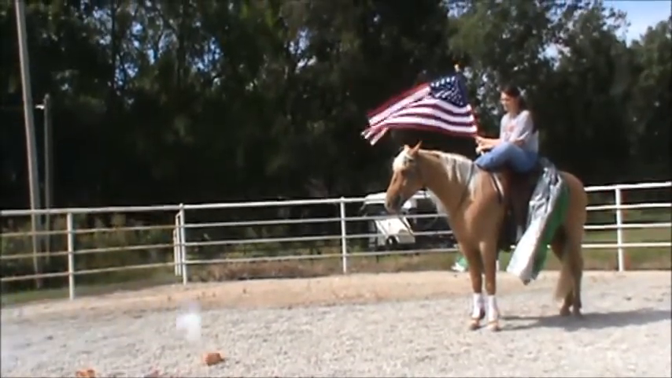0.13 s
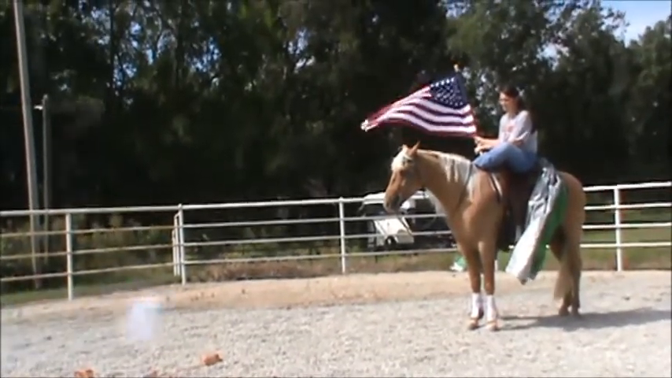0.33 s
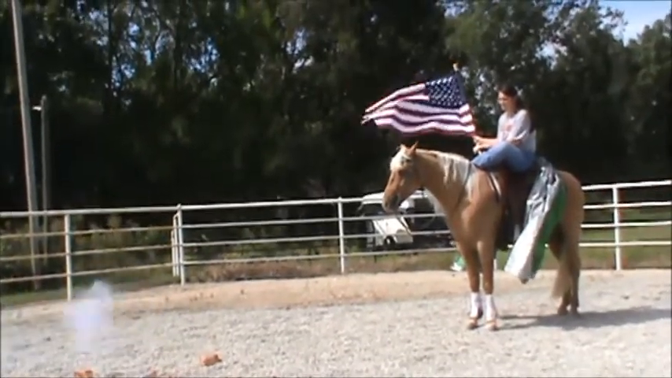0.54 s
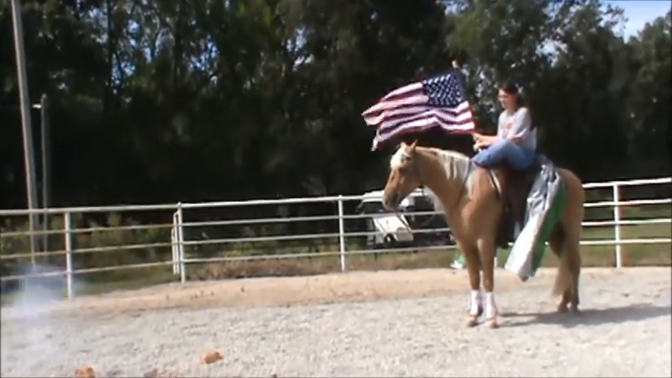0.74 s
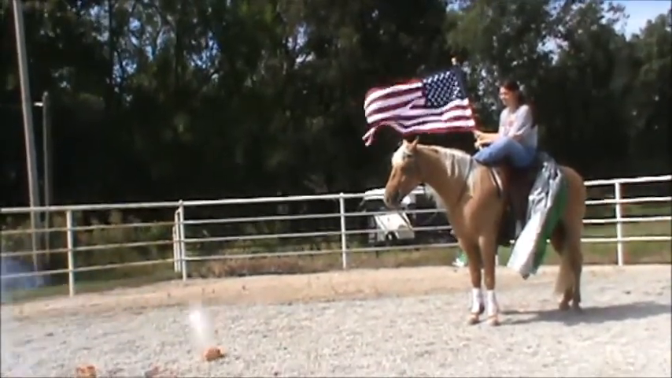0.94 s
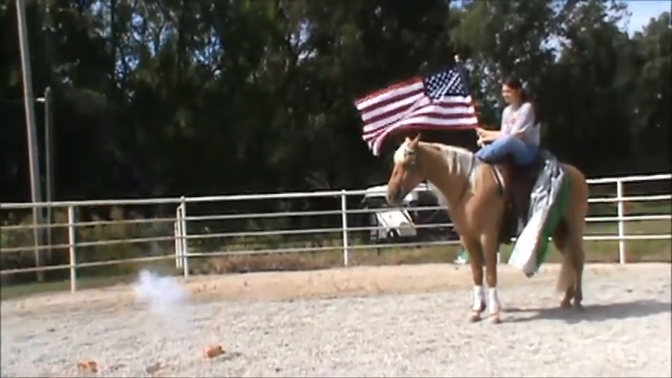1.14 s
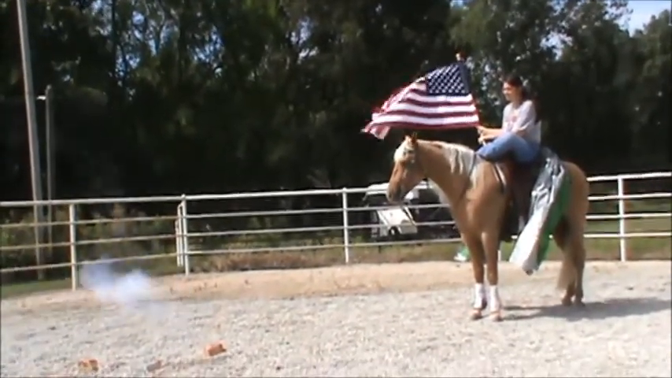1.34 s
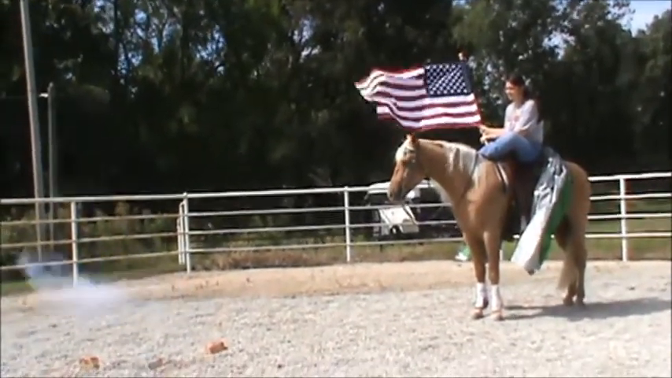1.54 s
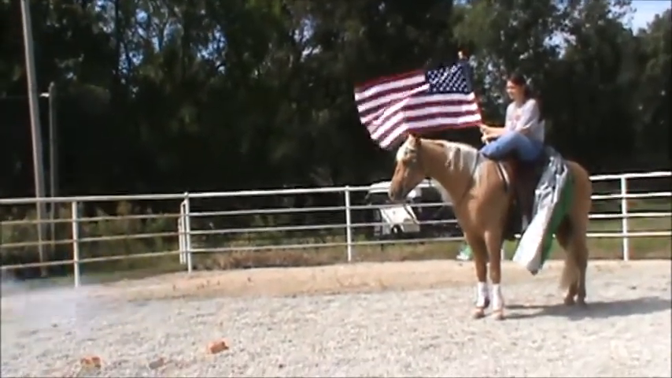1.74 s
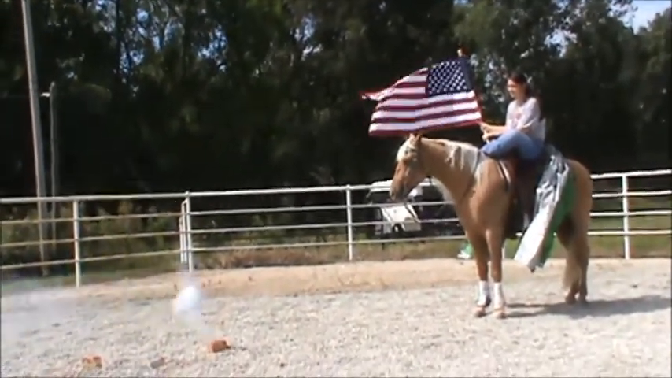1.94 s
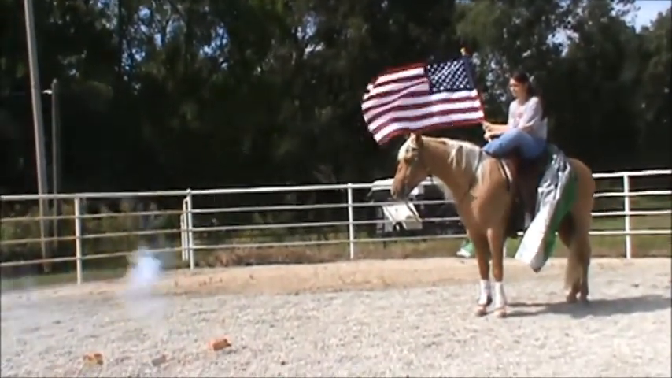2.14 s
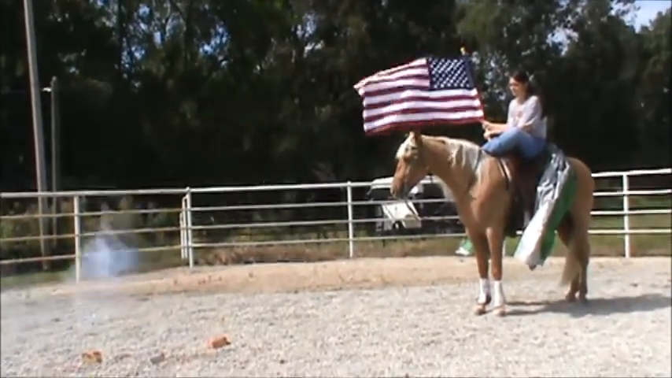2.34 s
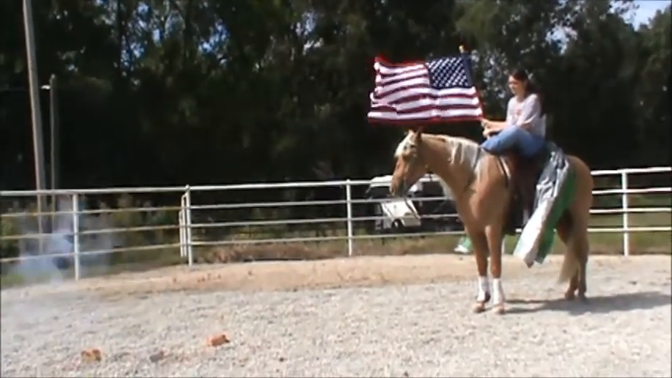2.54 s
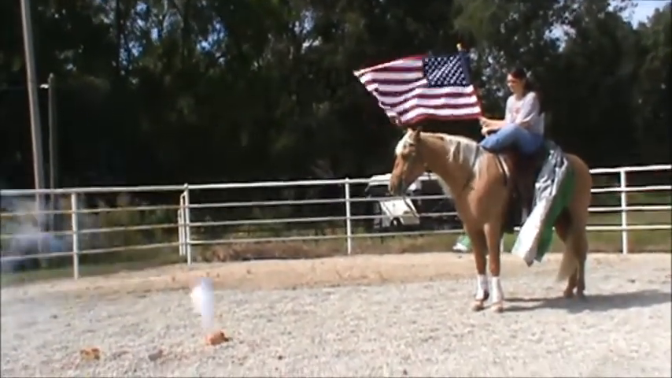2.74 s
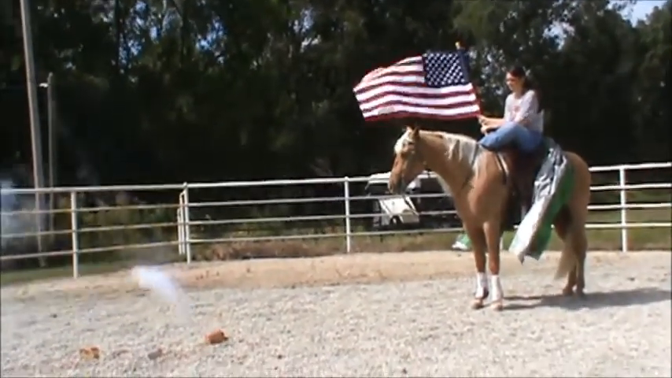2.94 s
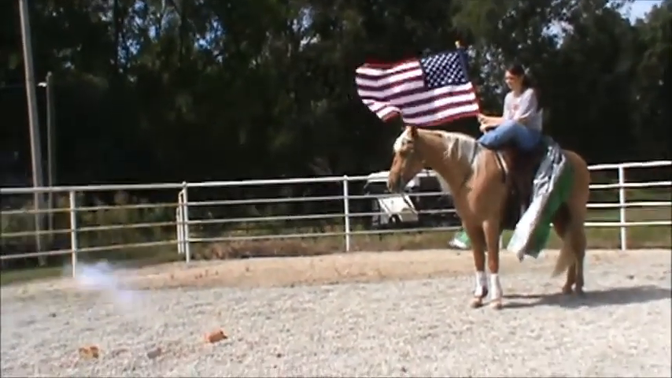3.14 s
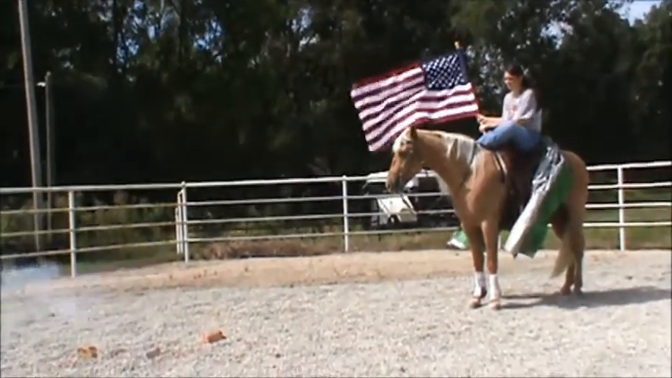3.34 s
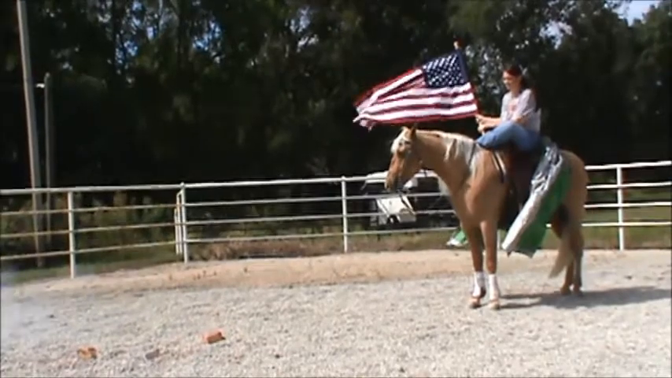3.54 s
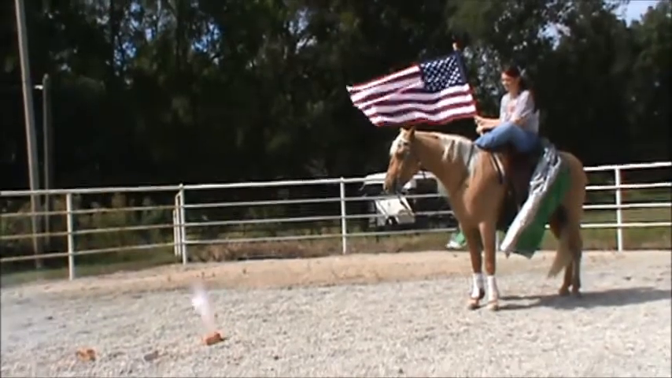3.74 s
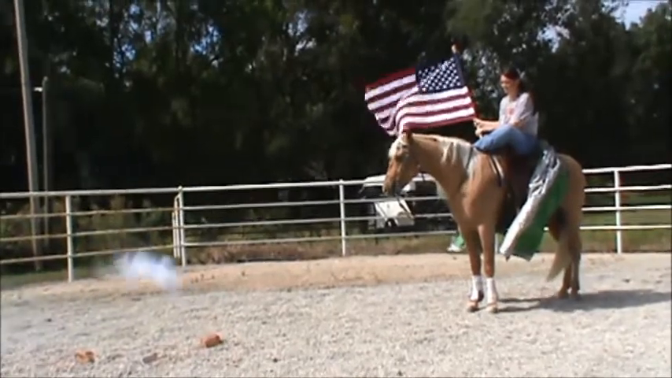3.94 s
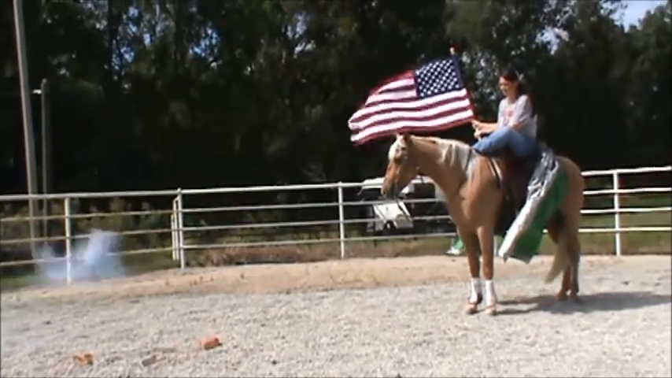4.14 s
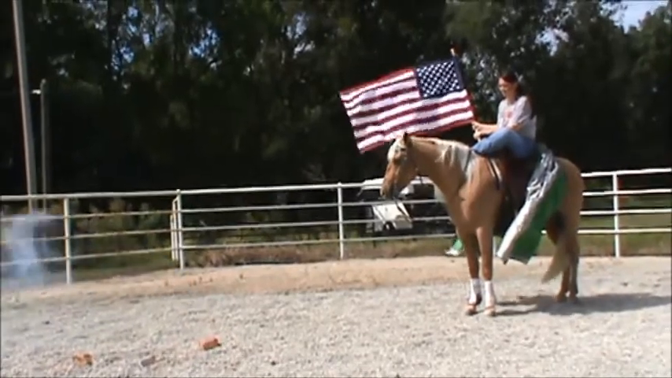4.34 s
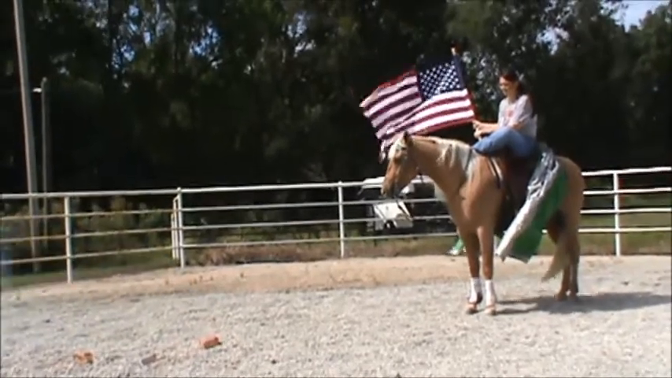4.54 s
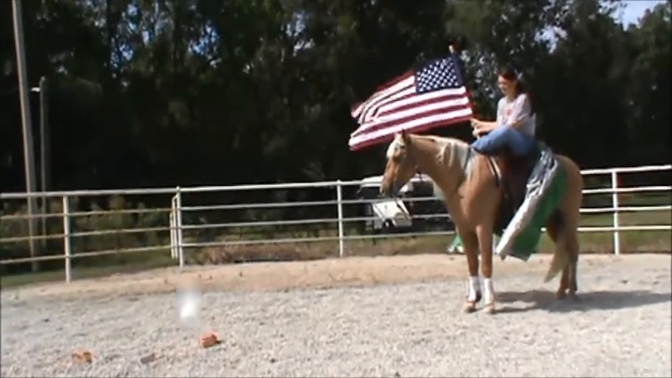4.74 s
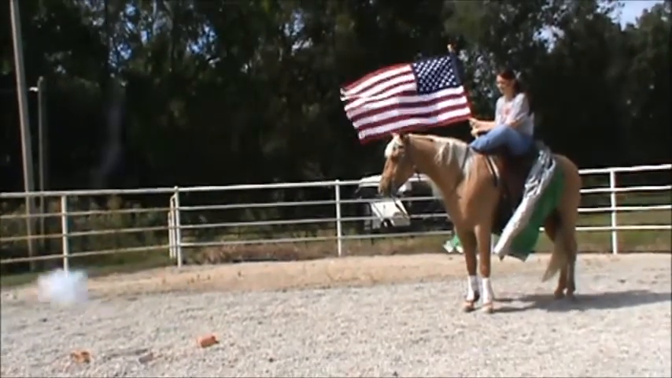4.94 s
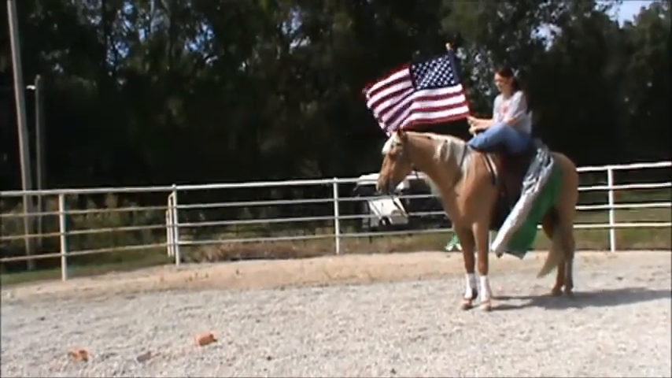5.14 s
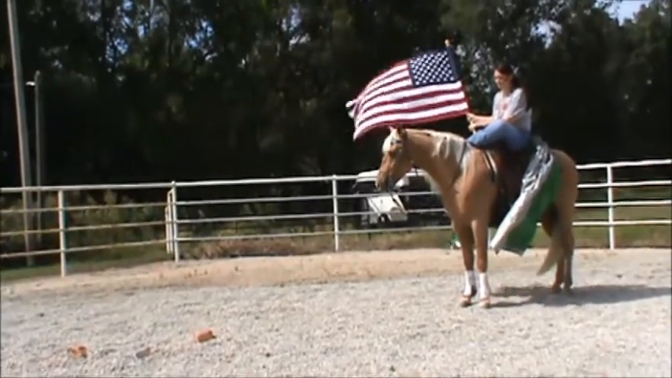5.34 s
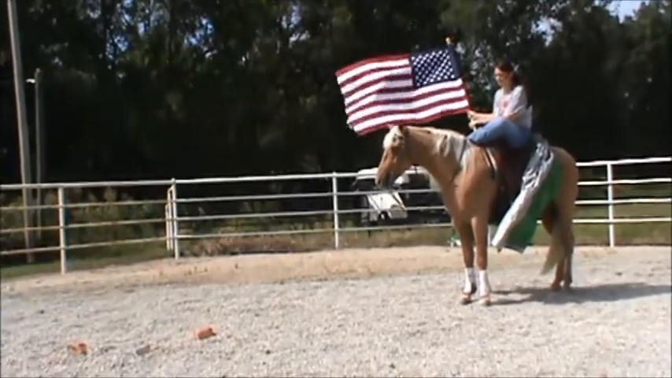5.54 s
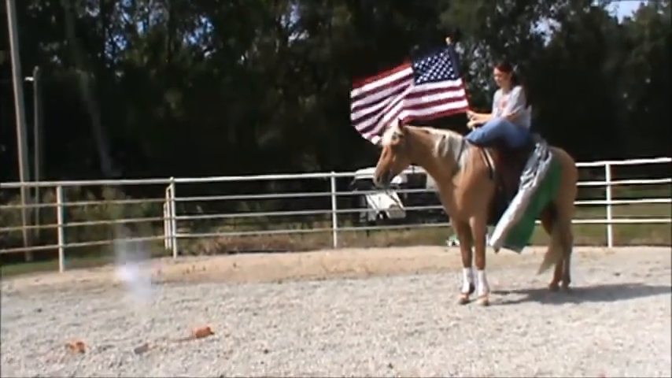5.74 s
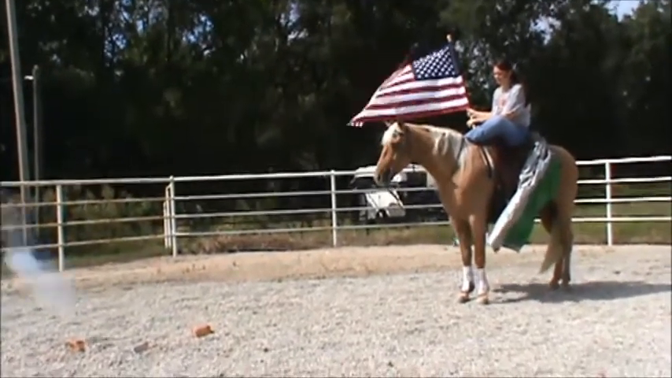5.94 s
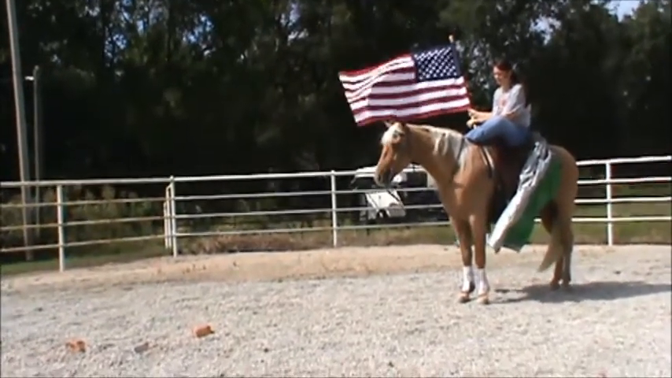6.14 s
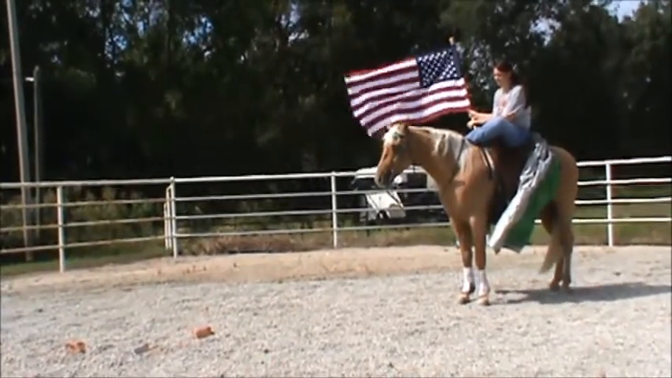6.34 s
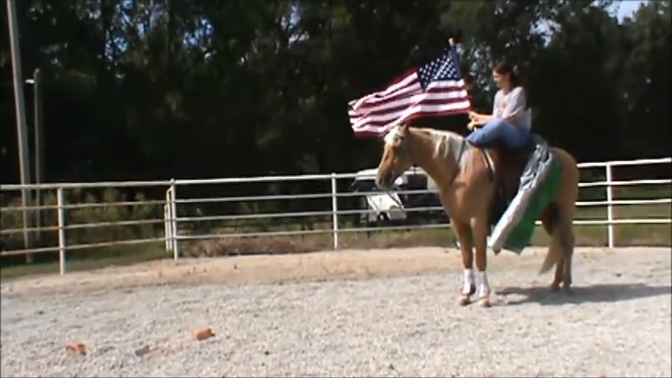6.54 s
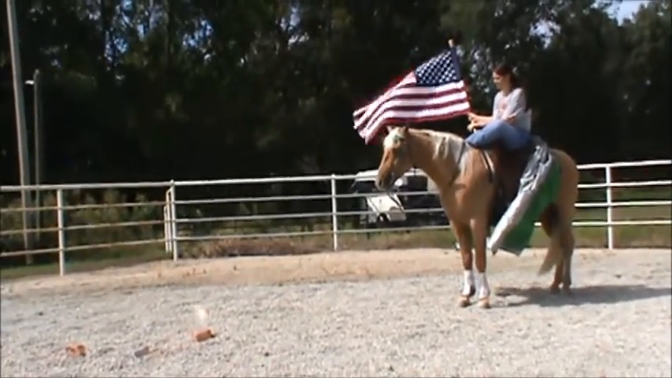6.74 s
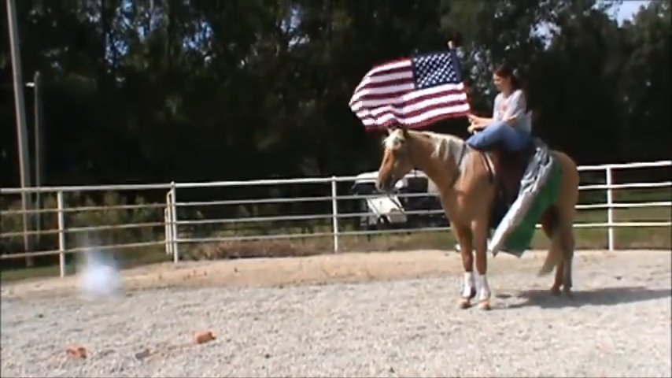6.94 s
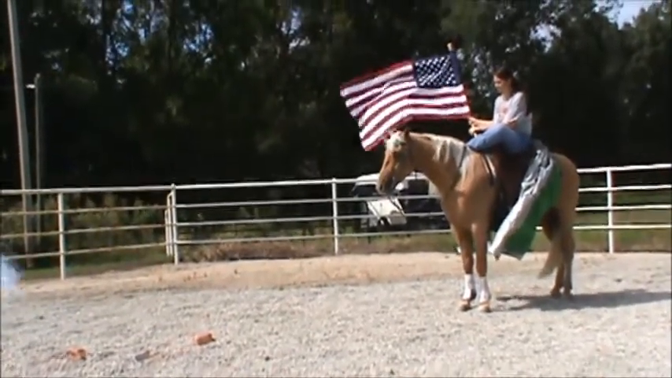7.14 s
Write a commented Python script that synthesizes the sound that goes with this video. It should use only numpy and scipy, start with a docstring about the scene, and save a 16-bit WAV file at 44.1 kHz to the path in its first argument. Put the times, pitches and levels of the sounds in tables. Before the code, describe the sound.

A string of small fireworks pop, whistle briefly and crack in the air outdoors, with wind on the microphone and faint hissing leaves.

```python
"""Small whistling rockets leave the ground one after another in an open sand arena.
Each starts with a pop. Its burning tube pulses, making a falling whistle that throbs as it mixes with
its echo off the sand. Then comes a sharp bang in the air, which the tree line throws back.
Leaves hiss and wind buffets the microphones, whose limiter turns everything down around each bang."""
import sys
import numpy as np
from scipy import signal
from scipy.fft import rfft, irfft
from scipy.io import wavfile
from scipy.ndimage import uniform_filter1d, minimum_filter1d

SR = 44100
rng = np.random.default_rng(int(sys.argv[2]) if len(sys.argv) > 2 else 0)


def master_out(mix):
    """Clip the mix to full scale and print it as 16-bit PCM to the path in sys.argv[1]."""
    frames = np.transpose(np.atleast_2d(mix))
    ceiling = np.clip(frames, -1, 1)
    pcm = np.round(ceiling * 32767).astype(np.int16)
    wavfile.write(sys.argv[1], SR, pcm)


N = 321930

# Hiss of leaves and air: (frequency [Hz], level [dB])
LEAF_COLOUR = [(290, -25), (500, -12), (604, -42), (668, -1.5), (1840, 3), (2650, -4.5), (2890, -4),
               (3650, -7.5), (6140, -11.5), (10800, -0.5), (16000, -17)]
# Wind strength: (time [s], level [dB])
WIND_LEVELS = [(0.0, -26), (0.18, -24), (0.26, -31), (0.75, -45), (0.81, -33), (0.95, -33.5), (1.299, -39),
               (1.44, -23), (1.59, -39), (1.67, -24), (1.85, -24), (2.2, -31.5), (2.6, -22.5), (2.95, -36),
               (3.599, -38), (3.68, -28.5), (3.76, -42), (4.29, -37), (5.41, -40), (5.69, -22),
               (5.81, -32.5), (6.63, -33.5), (6.73, -24.5), (6.93, -29.5), (7.3, -31.5)]
# Wind rumble: (frequency [Hz], level [dB])
WIND_COLOUR = [(12, -41), (20, -26), (66, -3), (139, 0.5), (285, -8), (484, -21.5), (648, -29.5),
               (960, -32), (1200, -49), (1560, -70), (2640, -120)]
# How alike the rumble is left and right: (frequency [Hz], likeness [0-1])
WIND_LIKENESS = [(30, 0.76), (60, 0.88), (125, 0.58), (240, 0.12), (950, 0.056), (3770, 0.73)]
# How long the arena rings: (frequency [Hz], time to fade by 60 dB [s])
ARENA_DECAY = [(300, 0.49), (700, 1.12), (1500, 1.13), (3000, 0.98), (6000, 0.84), (12000, 0.63)]
# Tone of the arena's echo: (frequency [Hz], level [dB])
ECHO_COLOUR = [(200, 8), (600, -3), (1500, -5), (2900, 1), (3700, -5), (4800, 1), (6500, -0.5), (12000, 3)]
# Echo strength as the trees answer: (delay [s], level [dB])
TREE_ECHOES = [(.0, 3), (.045, -5), (.075, -11.5), (.095, -5), (.14, -5), (.25, -5.5)]
# Distant pops: (time [s], level [dB], left over right [dB])
DISTANT_POPS = [(0.783, -19.5, -4)]
# Bangs in the air: (time [s], level [dB], sand echo delay [ms], fence echoes [dB], left over right [dB])
BANGS = [(0.2183, 21, 5.85, -2, -4), (1.33565, 15, 5.75, -10, 1), (2.1828, 14.5, 5.4, -7, 0),
         (3.1501, 13, 4.5, -11, 1.5), (4.00925, 13.5, 5.45, -12, -0.5), (5.021, 12.5, 5.7, -10, 0.5),
         (5.92163, 13.5, 5.9, -8, -3), (6.8663, 19, 6.0, -4, 1)]
# Echoes off the fence rails: (delay [ms])
FENCE_DELAYS = [1.25, 2.75]
# Launch pops: (time [s], crack level [dB], low push level [dB])
LAUNCH_POPS = [(0.183, -1, -9), (1.0038, 9, -1), (1.9604, 4.5, -12), (2.7873, -7, -14.5), (3.8141, 2, -13),
               (4.805, -0.5, -14.5), (5.695, -2, -10), (6.8302, 1, -13.5)]
# Spit of gas at launch: (frequency [Hz], level [dB])
SPIT_COLOUR = [(300, -40), (900, -12), (1700, -7), (3400, -2), (6000, -4), (10900, 0), (14000, -8),
               (16000, -12)]
# Hiss of the jet: (frequency [Hz], level [dB])
JET_COLOUR = [(400, -25), (1500, -20), (2300, -11), (3600, -9.5), (5800, -9.5), (7000, -6), (9000, 2),
              (11800, -3.5), (16000, -22.5)]
# One whistle a row: (start [s], burn [s], settling [ms], tone [dB], fade start [s], fade by the end [dB],
# first pitch [Hz], low pitch [Hz], fall length [s], last pitch [Hz], rise start [s], rise length [s],
# 2nd harmonic [dB], 3rd harmonic [dB], hiss [dB], first throb rate [Hz], first echo delay [ms],
# left over right once aloft [dB]). Fade and rise starts count from the whistle's start.
WHISTLES = [(0.196, .4, 1.15, -5.5, 0.29, -14, 3096, 2482, 0.33, 2720, 0.3, .13, -15, -14, -16, 46, 1.007, 4.5),
            (1.017, .43, 1.26, -8, 0.24, -15, 3083, 2463, 0.36, 2610, .39, 0.045, -15.5, -16.5, -17, 40.2, 1.076, 4),
            (1.972, 0.38, 2.33, -15.5, .32, -19.5, 3135, 2388, .33, 2710, .31, .07, -24.5, -24, -26.5, 45, 1.03, 7.5),
            (2.8, 0.45, 2.55, -16, 0.317, -9, 3168, 2437, 0.34, 2850, .39, 0.058, -25, -25, -25.5, 40, 1.025, 7),
            (3.827, .43, 1.42, -13, 0.33, -18, 3070, 2370, .33, 2690, .375, 0.074, -23, -19.5, -23, 45.75, 1.034, 7),
            (4.822, .38, 2.2, -11.5, 0.23, -12.5, 3135, 2609, 0.31, 2780, .32, .06, -24, -20, -23, 43.4, 1.015, 4.5),
            (5.719, .385, 12, -12, 0.26, -15.5, 3223, 2600, .29, 2936, 0.33, 0.032, -23.5, -21.5, -23.5, 43.75, 0.984, 9)]
# High harmonics: (multiple of the pitch, level beside the 3rd [dB])
HIGH_HARMONICS = [(4, -5), (5, -18.5)]
# Tone changes during each burn: (part burnt [0-1], 2nd harmonic [dB], 3rd harmonic [dB], hiss [dB])
BURN_STAGES = [(0, -6.5, -0.6, 2), (.15, -3, 0.6, -4), (.55, 0.5, -2.5, 0), (.8, -1.5, -7, -2),
               (.92, -1, -3, -3.5), (1, -19, -4, -2)]
# How much of the tone's fade each part follows: (2nd harmonic [share], 3rd harmonic [share], hiss [share])
FADE_SHARES = [0.94, 0.9, 1]
# How harmonics 1 to 5 follow the rocket's left-right lean: (share [minus = opposite side])
PAN_SHARES = [0.98, 0.51, 0.33, -0.47, -0.99]
# Brief dips in the whistle: (time [s], depth [dB], half width [s])
DROPOUTS = [(0.386, -10, 0.0087), (0.518, -12, 0.0088), (1.344, -13, 0.017), (3.165, -9, 0.017),
            (4.15, -20.5, 0.032), (5.082, -27, 0.0059), (5.135, -6.5, 0.01), (5.958, -14, 0.013)]


def amp(db):
    return 10 ** (np.asarray(db) / 20)


def unit_level(x):
    return x / np.sqrt(np.mean(x ** 2) + 1e-20)


def look_up(points, hz):
    f, value = np.transpose(points)
    return np.interp(np.log(hz + 1), np.log(f + 1), value)


def add(mix, start_s, sound):
    part = mix[:, round(start_s * SR):][:, :sound.shape[1]]
    part += sound[:, :part.shape[1]]


def panned(x, pan_db):
    return np.array([x * amp(pan_db / 2), x * amp(-pan_db / 2)])


def noise(colour, size, likeness):
    """Stereo noise with a given tone colour and left-right likeness."""
    hz = np.fft.rfftfreq(size, 1 / SR)
    left, other = rfft(rng.standard_normal((2, size)))
    same = np.clip(look_up(likeness, hz), -1, 1)
    right = same * left + np.sqrt(1 - same ** 2) * other
    return unit_level(irfft(np.array([left, right]) * amp(look_up(colour, hz)), size))


def wobble(size, hz):
    """A random wander of typical size 1, mostly slower than hz."""
    return unit_level(signal.lfilter(*signal.butter(2, hz, fs=SR), rng.standard_normal(size)))


def glide(age, from_s, length_s, bend=1):
    """Eases from 0 to 1; a bend under 1 moves early."""
    return np.sin(np.pi / 2 * np.clip((age - from_s) / length_s, 0, 1) ** bend) ** 2


def leaves():
    """Leaves and air hiss steadily, swelling a little."""
    level_db = -47.5 + 1.2 * wobble(N, hz=3)
    return amp(level_db) * noise(LEAF_COLOUR, N, likeness=[(1, 1.0), (2e4, 0.75)])


def wind():
    """Swirling air hits the microphones in low lumps that get brighter in gusts."""
    level_db = np.interp(np.arange(N) / SR, *np.transpose(WIND_LEVELS))
    lump_db = 4.42 * wobble(N, hz=16.6)
    rumble = noise(WIND_COLOUR, N, WIND_LIKENESS)
    bright = signal.lfilter(*signal.butter(2, 280, "high", fs=SR), rumble)
    gust_db = .6 * (level_db + 30) + 1.4 * lump_db - 8.5
    return amp(level_db) * (unit_level(rumble * amp(lump_db)) + bright * amp(gust_db))


def arena_echo(sound):
    """Many small echoes swell when the tree line answers; each frequency dies at its own speed."""
    size = 3 * SR // 2
    echoes = np.zeros((2, size))
    arrivals = np.arange(300, size - 20, 20) + rng.integers(0, 20, (2, (size - 301) // 20))
    strengths = rng.choice([-1., 1.], arrivals.shape) * rng.uniform(0.6, 1.04, arrivals.shape)
    np.put_along_axis(echoes, arrivals, strengths, 1)
    echoes[1] = 0.57 * echoes[0] + 0.61 * echoes[1]
    echoes *= amp(1.9 * wobble(size, hz=82))  # trunks stand in clumps
    hz, t, bands = signal.stft(echoes, SR, nperseg=256)
    shape_db = look_up(ECHO_COLOUR, hz)[:, None] + np.interp(t, *np.transpose(TREE_ECHOES))
    shape_db -= 60 * t / look_up(ARENA_DECAY, hz)[:, None]
    tail = signal.istft(bands * amp(shape_db), SR, nperseg=256)[1]
    return signal.fftconvolve(sound.mean(0)[None], tail / np.linalg.norm(tail[0]), axes=1)[:, :N]


def blast(sharp):
    """A pressure wave: a steep front, then one swing back."""
    t = np.arange(200) / SR
    front = t / .000035 * np.exp(1 - t / .000035)
    swing = np.sin(2 * np.pi * 1150 * t) * np.exp(-t / 0.00041) * np.minimum(t / .0001, 1)
    return swing - sharp * front


def bang(level_db, sand_ms, fence_db, pan_db):
    """A blast in the air, then duller echoes off the fence rails and the sand."""
    sound = np.zeros((1, 600))
    add(sound, 0, blast(sharp=1.05)[None])
    for ms in FENCE_DELAYS:
        add(sound, ms / 1000, amp(fence_db) * blast(sharp=0.04)[None])
    add(sound, sand_ms / 1000, amp(-3.5) * blast(sharp=.3)[None])
    return panned(amp(level_db) * sound[0], pan_db)


def launch(crack_db, push_db):
    """A spit of gas builds to a snap, with one low push out of the knocking tube."""
    t = np.arange(1200) / SR - .004  # the snap is at t = 0
    burst = np.exp(-np.abs(t) / np.where(t < 0, .0006, .0008))
    trail = amp(-17.5) * np.exp(-np.abs(t) / np.where(t < 0, .002, .015))
    spit = (burst + trail) * noise(SPIT_COLOUR, len(t), likeness=[(1, 1.0), (2e4, 0.94)])
    snap = np.sin(2 * np.pi * 7000 * t) * np.exp(-(t / .00006) ** 2)
    push = np.sin(2 * np.pi * 330 * t) * np.exp(-t / 0.0027)
    knock = 0.89 * np.sin(2 * np.pi * 850 * t) * np.exp(-t / 0.0015)
    return amp(crack_db) * (amp(-10) * spit + 0.55 * snap) + amp(push_db) * (push + knock) * (t > 0)


def sand_echo(sound, age, hz, throb_hz, first_ms):
    """As the rocket climbs, its echo off the sand comes later and weaker, and throbs against it."""
    delay_s = first_ms / 1000 + np.cumsum(throb_hz * np.exp(-age / 0.568) / hz) / SR
    return np.interp(age - delay_s, age, sound, left=0) * amp(-8 - 16 * age)


def whistle(start_s, burn_s, settle_ms, tone_db, fade_s, lost_db, first_hz, low_hz, fall_s, last_hz,
            turn_s, rise_s, second_db, third_db, hiss_db, throb_hz, echo_ms, pan_db):
    """The burning tube pulses, making a tone with harmonics (multiples of its pitch) over a jet's hiss."""
    age = np.arange(0, burn_s, 1 / SR)
    size = len(age)
    # The pitch sinks as the rocket speeds away and flicks up as it dies.
    fall, rise = glide(age, 0, fall_s, bend=0.95), glide(age, turn_s, rise_s)
    hz = first_hz + (low_hz - first_hz) * fall + (last_hz - low_hz) * rise
    settle = 1 + 0.149 * np.exp(-age / (settle_ms / 1000))  # starts high until the burn steadies
    unsteady = 0.006 * wobble(size, hz=254) + 0.008 * wobble(size, hz=22)
    phase = 2 * np.pi * np.cumsum(hz * (settle + unsteady)) / SR

    fade_db = lost_db * np.clip((age - fade_s) / (burn_s - fade_s), 0, 1) ** 0.77
    dips_db = sum(db * np.exp(-((start_s + age - s) / half_s) ** 2) for s, db, half_s in DROPOUTS)
    burnt, *curves = np.transpose(BURN_STAGES)
    second_shift, third_shift, hiss_shift = (
        np.interp(age / burn_s, burnt, curve) + share * fade_db
        for curve, share in zip(curves, FADE_SHARES))
    tone_db += fade_db + dips_db
    second_db += second_shift + 0.2 * dips_db
    third_db += third_shift + 0.55 * dips_db
    levels = [(1, tone_db), (2, second_db), (3, third_db)]
    levels += [(k, third_db + db - 21 * rise) for k, db in HIGH_HARMONICS]  # these fade in the last rise

    on_off = np.minimum(age / settle_ms * 1800, 1) * np.minimum((age[-1] - age) / 0.016, 1)
    harmonics = []
    for k, db in levels:
        flicker_db = 1.82 * np.sqrt(k) * wobble(size, hz=79)
        harmonics.append(np.sqrt(2) * on_off * amp(db + flicker_db) * np.cos(k * phase))
    hiss_db += hiss_shift + 1.5 * wobble(size, hz=60)  # the jet splutters
    jet = on_off * amp(hiss_db) * noise(JET_COLOUR, size, likeness=[(1, 1.0), (2e4, 0.59)])
    drift_db = pan_db * (1 - 0.86 * np.exp(-age / 0.04))  # drifts left as it climbs
    direct = jet + sum(panned(tone, share * drift_db) for tone, share in zip(harmonics, PAN_SHARES))
    return direct + sand_echo(jet[0] + sum(harmonics), age, hz, throb_hz, echo_ms)


def scene():
    """Whistles, pops and bangs with their arena echo, over wind and leaves."""
    direct, to_arena = np.zeros((2, 2, N))
    for start_s, *settings in WHISTLES:
        sound = whistle(start_s, *settings)
        add(direct, start_s, sound)
        age = np.arange(sound.shape[1]) / SR
        add(to_arena, start_s, sound * amp(-5.5 - 50 * age))  # fills the arena most while low
    for time_s, crack_db, push_db in LAUNCH_POPS:
        sound = launch(crack_db, push_db)
        add(direct, time_s - .003, sound)
        add(to_arena, time_s - .003, np.diff(sound) * amp(-17))  # the low push does not carry
    for time_s, level_db, *settings in BANGS:
        add(direct, time_s, bang(level_db, *settings))
        add(to_arena, time_s, amp(level_db - 1.5) * blast(sharp=0.91)[None])
    for time_s, level_db, pan_db in DISTANT_POPS:
        add(direct, time_s, panned(amp(level_db) * blast(sharp=0.079), pan_db))
    return direct + arena_echo(to_arena) + wind() + leaves()


def record(dry):
    """A limiter turns down just before each peak and lets go fast, then slowly; the top treble is cut."""
    ahead, ramp = 110, 30  # samples
    ceiling_db, cutoff_hz = -1.5, 15900
    t = np.arange(N) / SR
    over_db = np.maximum(20 * np.log10(np.abs(dry).max(0) + 1e-9) - ceiling_db, 1e-6)
    held_db = sum(share * np.exp(np.maximum.accumulate(np.log(over_db) + t / release_s) - t / release_s)
                  for share, release_s in [(.65, .012), (.35, .15)])
    coming_db = -minimum_filter1d(-held_db, ahead, origin=-ahead // 2)
    limited = dry / amp(uniform_filter1d(coming_db, ramp, origin=ramp // 2 - 1))
    treble_cut = signal.firwin(255, cutoff_hz, window=("kaiser", 9), fs=SR)
    return signal.oaconvolve(limited, treble_cut[None], "same")


dry = scene()
out = record(dry)
master_out(out)
```